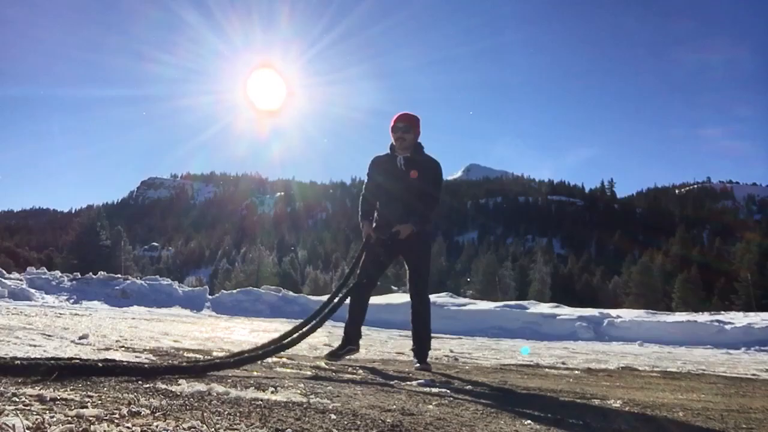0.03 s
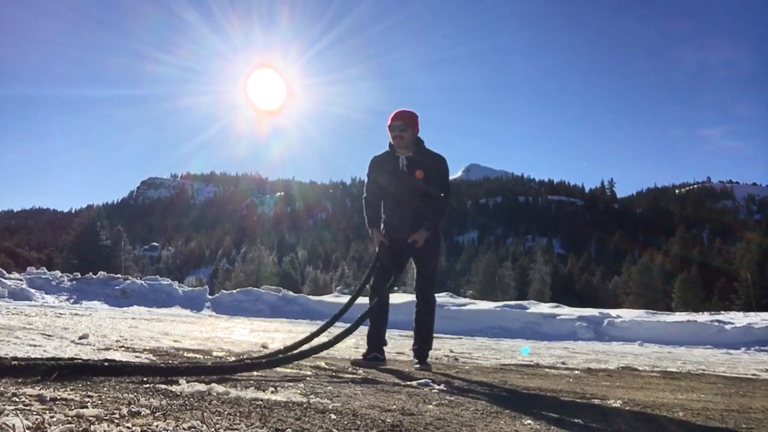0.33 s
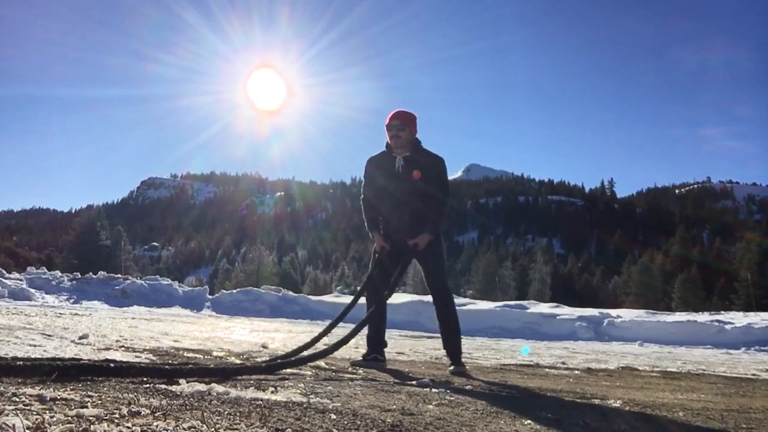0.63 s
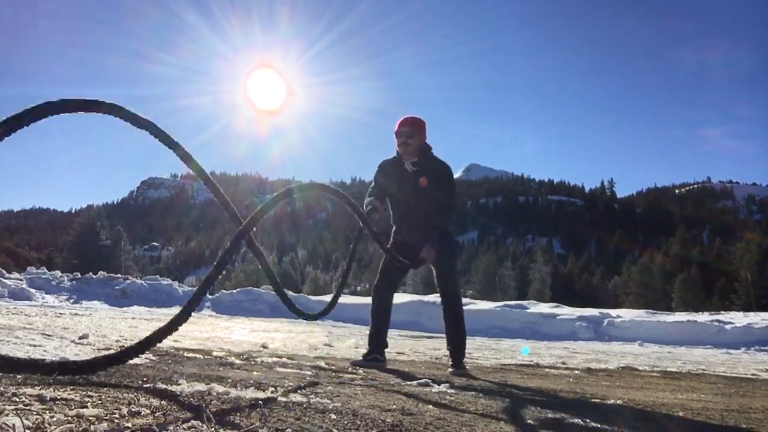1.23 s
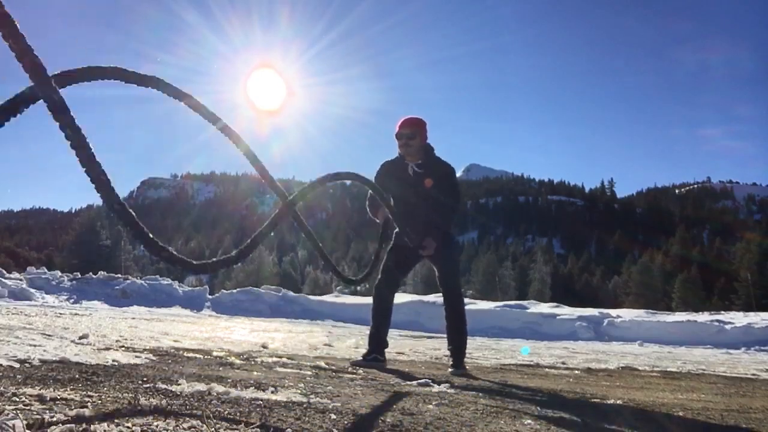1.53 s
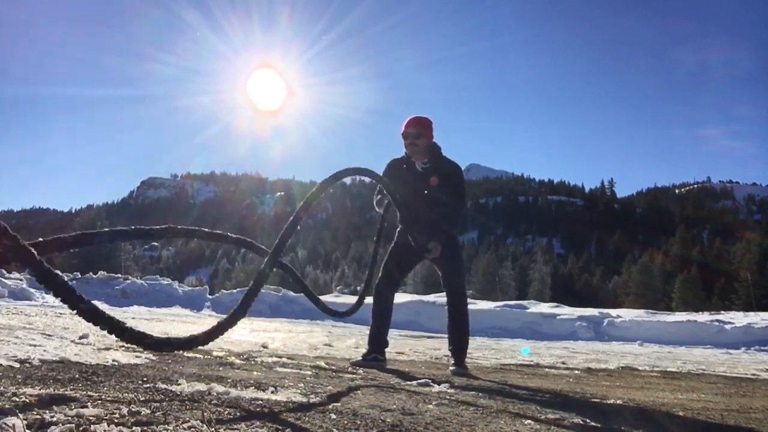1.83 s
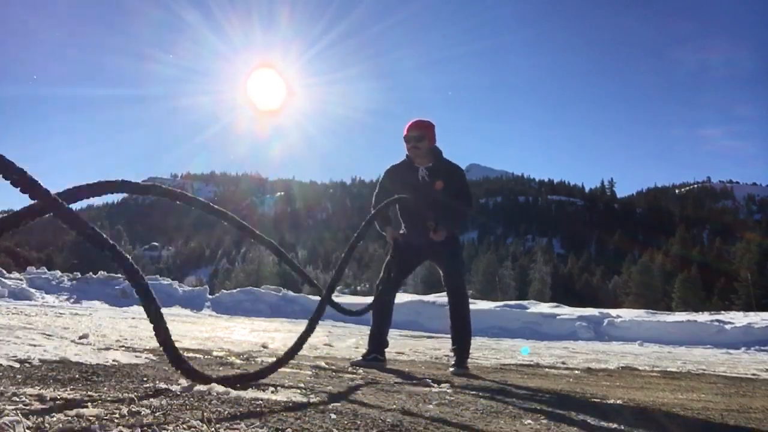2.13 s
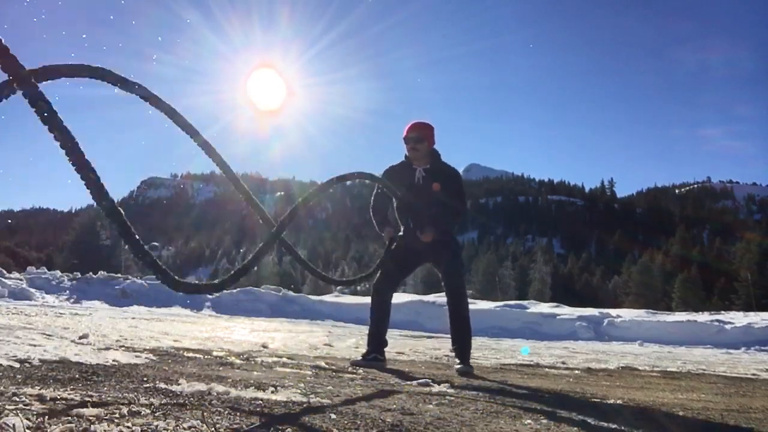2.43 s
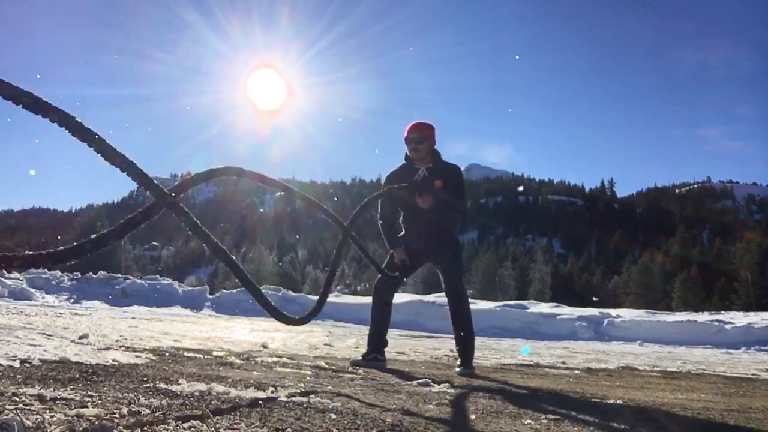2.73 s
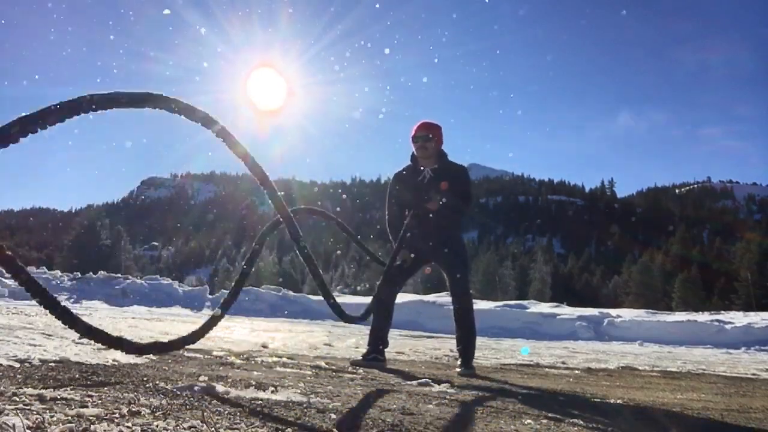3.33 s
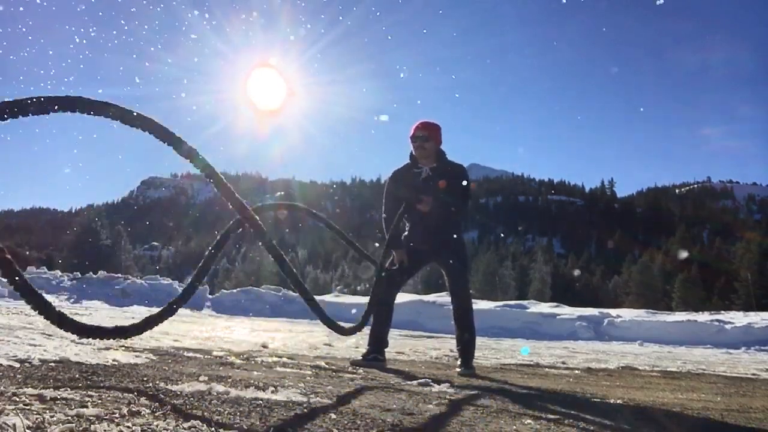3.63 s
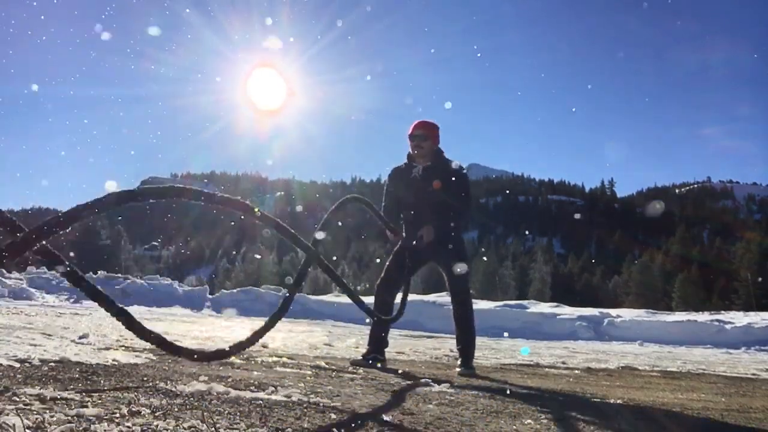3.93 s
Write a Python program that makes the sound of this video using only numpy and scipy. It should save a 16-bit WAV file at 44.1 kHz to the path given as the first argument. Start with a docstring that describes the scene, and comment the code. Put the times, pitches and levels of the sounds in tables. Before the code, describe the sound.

Two heavy ropes thump repeatedly on icy gravel, crunching and scattering grit outdoors.

```python
"""Outdoors on frozen, gritty ground: two heavy ropes are whipped down in turn.
Each landing loop gives a low thump that falls in pitch and a crunch of gravel and ice; thrown grit
patters down after it. Feet shuffle before the first blow. The ropes drag over the grit and their
twisted fibres rasp. Light wind and a faint far hum lie underneath."""
import sys
import numpy as np
from scipy import signal
from scipy.io import wavfile
from scipy.ndimage import map_coordinates

SR = 44100
rng = np.random.default_rng(int(sys.argv[2]) if len(sys.argv) > 2 else 0)


def file_out(sig):
    """Save sig as 16-bit WAV at sys.argv[1]."""
    # one column per channel
    cols = np.atleast_2d(sig).T
    # limit, then scale
    lim = np.clip(cols, -1, 1)
    pcm = np.round(lim * 32767).astype(np.int16)
    wavfile.write(sys.argv[1], SR, pcm)


N = 176400
TIME_S = np.arange(N) / SR

# Spectra. Each row: frequency in Hz, relative density in dB.
WIND_SPECTRUM = [(25, -23), (45, -1.5), (70, -4), (110, -1), (160, -3), (210, -5.5), (300, -1.5),
                 (400, -15.5), (750, -15.5), (1800, -31.5), (6000, -37), (15000, -49)]
GRIT_SPECTRUM = [(500, -4), (1200, -1), (2200, 3), (4000, -2), (5400, -1.5), (7500, -0.5), (11000, 1.5),
                 (15500, 1)]
SCUFF_SPECTRUM = [(300, 7), (1000, -2.5), (2500, -2.5), (5000, -14), (15000, -24)]
ICE_SPECTRUM = [(500, -21), (1200, -12.5), (2200, -1.5), (4000, -6.5), (5400, -1), (7500, -3.5), (11000, 0),
                (15500, -0.5)]
GRAVEL_SPECTRUM = [(200, 10), (400, 8), (650, -4), (1200, -8), (2000, -7), (4000, -12), (15000, -45)]
SWING_SPECTRUM = [(40, 7), (90, 8), (200, 6.5), (400, -1), (1000, -15.5), (3000, -94.5), (15000, -58)]
SPRAY_SPECTRUM = [(2000, -21), (6000, -7), (11000, -6.5), (15500, -3)]
# Ropes lifted off the grit. Each row: time in seconds, relative level in dB.
DRAG_CURVE = [(.04, -67.5), (.2, -71), (.5, -60.5), (.56, -79), (.7, -70), (.8, -70.5), (.9, -64),
              (.95, -70), (1.07, -70), (1.11, -57), (1.18, -61), (1.25, -73.5), (1.31, -54.5), (1.39, -53),
              (1.46, -57), (1.52, -58), (1.58, -55)]
# Loose grit while the ropes swing. Each row: time in seconds, relative level in dB.
PATTER_CURVE = [(1.58, -65), (1.66, -51.5), (1.86, -51.5), (2.05, -51), (2.25, -55), (2.42, -51),
                (2.55, -44), (2.62, -51.5), (2.76, -51.5), (2.94, -44.5), (3.07, -54.5), (3.15, -45),
                (3.23, -56), (3.38, -49), (3.6, -49), (3.74, -49.5), (3.86, -53), (4, -45.5)]
# Fibre resonances. Each row: frequency in Hz, width in Hz, relative level in dB.
FIBRE_MODES = [(1700, 34, -5.5), (1897, 40, -3), (1980, 186, 0), (2270, 120, -14.5), (3180, 140, -12)]
# Swells. Each row: centre in seconds, level in dB, half length in seconds.
FIBRE_RUBS = [(1.5, -59.5, 0.029), (1.655, -47, 0.02), (1.83, -50, 0.051), (2.37, -49.5, 0.014),
              (2.44, -48.5, 0.03), (2.575, -59.5, 0.11), (2.73, -53.5, 0.11), (2.87, -49, 0.044),
              (2.94, -56, 0.017), (3.035, -47.5, 0.011), (3.18, -52.5, 0.021), (3.255, -53, 0.028),
              (3.375, -57, 0.023), (3.565, -46.5, 0.016), (3.645, -50.5, 0.028), (3.85, -52, 0.027),
              (3.93, -57, .02)]
SCUFFS = [(0.114, -58, 0.037), (0.24, -52.5, 0.015), (.365, -53.5, 0.021), (.405, -50.5, 0.012),
          (.462, -53, .01), (.51, -54, 0.026), (1.051, -56.5, 0.022), (1.169, -49, 0.0087),
          (1.354, -74, .06)]
SLEEVE_BRUSHES = [(0.698, -58, 0.019)]
WIND_PUFFS = [(1.3, -62, 0.25), (1.8, -50, 0.044), (2.83, -51, 0.075)]
# Chips landing close by. Each row: start in seconds, peak in dB, band centre in Hz.
CHIP_LANDINGS = [(0.235, -50, 4500), (1.173, -40, 5000), (1.604, -26, 8600), (1.772, -27, 7900),
                 (1.9, -20, 6260), (1.9208, -22.5, 8800), (2.015, -25, 8040), (2.1441, -20.5, 3020),
                 (2.155, -15, 8000), (2.4654, -17, 7100), (2.528, -23.5, 9800), (2.6075, -24, 11300),
                 (2.7945, -16, 6000), (2.8014, -16.5, 8000), (2.821, -30, 10000), (2.846, -21.5, 6600),
                 (2.9809, -23.5, 2460), (3.103, -18.5, 6000), (3.364, -25.5, 9100), (3.396, -29, 10000),
                 (3.4368, -15.5, 8000), (3.711, -24.5, 10600), (3.7138, -14.5, 9000), (3.7599, -12, 12100),
                 (3.7605, -25.5, 1410), (3.7795, -17, 7000), (3.803, -27, 1620), (3.823, -28, 12000),
                 (3.844, -26, 12100), (3.887, -25, 10000), (3.929, -24.5, 2780), (3.957, -23.5, 5700)]
# Rope crushing grit. Each row: start in seconds, ice and gravel levels in dB,
# then attack, hold and release in seconds.
GRIT_CRUSHES = [(1.593, -34, -34, 0.02, 0.0048, 0.017), (1.689, -43.5, -34.5, 0.01, 0.0064, 0.024),
                (1.76, -34.5, -43, 0.0088, 0.0022, 0.016), (1.89, -38.5, -51, 0.0022, .003, 0.046),
                (1.941, -37.5, -34, 0.0044, 0.022, 0.0041), (2.007, -38, -47.5, 0.0044, 0.0035, 0.009),
                (2.0244, -34.5, -32, 0.0014, 0.0017, 0.0052), (2.094, -48.5, -37.5, 0.001, 0.017, 0.0096),
                (2.1506, -33, -53.5, 0.0025, .013, 0.032), (2.283, -39.5, -68, 0.0073, 0.0022, 0.016),
                (2.342, -43, -38, 0.0073, .004, .009), (2.462, -30, -45, 0.0017, 0.018, 0.012),
                (2.654, -36.5, -25.5, 0.0096, 0.003, 0.0027), (2.793, -25, -42.5, 0.0012, 0.0046, 0.011),
                (2.972, -44.5, -41.5, 0.0031, 0.037, 0.0057), (3.094, -29, -38, 0.0054, 0.0022, 0.011),
                (3.116, -33.5, -42, 0.0018, 0.0035, 0.0092), (3.303, -33.5, -35.5, 0.019, 0.007, 0.0056),
                (3.4342, -28.5, -45.5, 0.0011, 0.023, 0.0089), (3.551, -44, -65, 0.013, 0.0026, 0.0066),
                (3.652, -33, -40.5, 0.0056, 0.0012, 0.0036), (3.7786, -23.5, -38, 0.0011, .002, 0.004),
                (3.784, -32.5, -41, .003, 0.012, 0.032), (3.941, -38.5, -46, 0.012, 0.0017, 0.0045),
                (3.984, -38.5, -45, .005, 0.0075, .015)]
# Loops landing. Each row: start in seconds, envelope peak in dB, initial pitch in Hz, rise in seconds.
LOOP_LANDINGS = [(1.6153, -14.5, 179, 0.0028), (1.708, -26, 187, 0.0054), (1.773, -36, 198, 0.0023),
                 (1.904, -31, 222, 0.0028), (1.946, -30.5, 1410, 0.00094), (1.957, -30.5, 480, 0.0011),
                 (2.0278, -27.5, 770, 0.0012), (2.0337, -15, 200, 0.0042), (2.096, -28.5, 825, 0.00057),
                 (2.157, -30, 217, 0.0028), (2.3504, -19, 173, 0.0061), (2.467, -25, 200, 0.0038),
                 (2.6631, -13.5, 284, 0.0055), (2.665, -26.5, 420, 0.0022), (2.809, -29, 228, 0.0025),
                 (3.0013, -8.5, 193, 0.0039), (3.107, -29.5, 354, 0.0024), (3.1426, -20, 178, 0.0047),
                 (3.323, -23, 167, 0.0055), (3.3225, -31, 700, 0.0015), (3.4392, -17, 204, 0.0019),
                 (3.546, -28, 218, 0.0042), (3.657, -26.5, 790, 0.00072), (3.6583, -19, 368, 0.003),
                 (3.6601, -9.5, 195, 0.0049), (3.781, -29.5, 216, 0.0042), (3.847, -23, 190, 0.006)]


def from_db(db):
    return 10 ** (np.asarray(db) / 20)


def unit_rms(x):
    return x / np.sqrt(np.mean(x ** 2) + 1e-20)


def white():
    return rng.standard_normal(N)


def band(x, low_hz, high_hz):
    sos = signal.butter(2, [low_hz, min(high_hz, .47 * SR)], "band", fs=SR, output="sos")
    return signal.sosfilt(sos, x + 1e-18)


def resonate(x, hz, width_hz):
    """One resonance, rms 1."""
    r = np.exp(-np.pi * width_hz / SR)
    return unit_rms(signal.lfilter([1, 0, -1], [1, -2 * r * np.cos(2 * np.pi * hz / SR), r * r], x))


def curve_gain(rows, fade_s=0.0067):
    """Gain along a level curve, fading beyond its ends."""
    times_s, db = np.transpose(rows)
    outside_s = np.abs(TIME_S - np.clip(TIME_S, times_s[0], times_s[-1]))
    return from_db(np.interp(TIME_S, times_s, db)) * np.exp(-outside_s / fade_s)


def swells(rows):
    """Sum of bell-shaped gains."""
    return sum(from_db(db) * np.exp(-np.minimum(((TIME_S - centre_s) / half_s) ** 2, 20))
               for centre_s, db, half_s in rows)


def flutter(rate_hz, depth_db):
    """Randomly wandering gain."""
    knots = rng.standard_normal(2000)
    return from_db(depth_db * np.interp(TIME_S * rate_hz, np.arange(len(knots)), knots))


def coloured(spectrum, source):
    """Weighted half-octave bands, fed in rotation by three draws of the source; rms 1."""
    hz, db = np.transpose(spectrum)
    edges_hz = 24 * 2 ** np.arange(0, 10, .5)
    out, feeds = 0, [source(), source(), source()]
    for k, (low, high) in enumerate(zip(edges_hz, edges_hz[1:])):
        if high > hz[0]:
            band_db = np.interp(np.log(low * high) / 2, np.log(hz), db)
            out = out + from_db(band_db) * band(feeds[k % len(feeds)], low, high)
    return unit_rms(out)


def wind(steady_db=-52.5, swing_db=-52.5):
    """Low wind, more once the ropes swing."""
    swinging = np.interp(TIME_S, [1.25, 1.7], [0, 1])
    stirred = swinging * from_db(swing_db) * coloured(SWING_SPECTRUM, white)
    return from_db(steady_db) * coloured(WIND_SPECTRUM, white) + stirred


def hum(base_hz=157.6, waver_hz=2.5, level_db=-52.5):
    """Far tone, wavering in pitch and level."""
    hz = base_hz + waver_hz * (flutter(8.3, depth_db=4) - 0.5)
    tone = np.sin(2 * np.pi * np.cumsum(hz) / SR)
    return from_db(level_db) * unit_rms(tone * flutter(21, depth_db=4))


def grains(spectrum, per_s, spread_db):
    """Tiny random fractures of uneven size."""
    hits = rng.random(N) < per_s / SR
    sizes = hits * from_db(spread_db * np.minimum(rng.exponential(1, N), 4))
    return ground_bounce(coloured(spectrum, lambda: sizes * white() * flutter(40, depth_db=2.25)))


def ground_bounce(x, gain=0.31, typical_lag_s=0.001107):
    """Add the reflection off hard ground; the lag wanders as contact moves along the rope."""
    lag_s = typical_lag_s * flutter(7, depth_db=2.5)
    reflected = map_coordinates(x, [(TIME_S - lag_s) * SR], order=3)
    return (x + gain * reflected) / np.hypot(1, gain)


def dragging(grit_trim_db=1):
    """Loose grit shifts under the ropes; twisted fibres rub as they flex."""
    grit = grains(GRIT_SPECTRUM, per_s=3500, spread_db=1) * flutter(70, depth_db=5)
    grit_gain = from_db(grit_trim_db) * (curve_gain(DRAG_CURVE) + curve_gain(PATTER_CURVE))
    modes = sum(from_db(db) * resonate(white(), hz, width_hz) for hz, width_hz, db in FIBRE_MODES)
    rasp = unit_rms(modes) * flutter(160, depth_db=4)
    return grit_gain * grit + swells(FIBRE_RUBS) * rasp


def shuffles():
    """Feet and rope scuff; a sleeve brushes the jacket."""
    cloth = swells(SLEEVE_BRUSHES) * unit_rms(band(white(), 5000, 11500))
    return swells(SCUFFS) * grains(SCUFF_SPECTRUM, per_s=1400, spread_db=5.5) + cloth


def chips(decay_s=.0007, edge_ratio=1.7):
    """Each chip of ice or stone lands with one short tick."""
    out, t = np.zeros(N), np.arange(SR // 50) / SR
    for start_s, db, hz in CHIP_LANDINGS:
        burst = rng.standard_normal(len(t)) * np.exp(-t / decay_s)
        tick = band(burst, hz / edge_ratio, hz * edge_ratio)
        i = int(start_s * SR)
        out[i:i + len(t)] += (from_db(db) * tick / np.abs(tick).max())[:N - i]
    return out


def gusts():
    """Soft, deep puffs of wind."""
    return swells(WIND_PUFFS) * unit_rms(band(white(), 45, 120))


def crunches(spray_re_ice_db=-29.5, spray_rise_s=0.032):
    """Ice and gravel break under the rolling rope; a thin spray of grit follows."""
    ice_power, gravel_power, spray_power = np.zeros((3, N))
    for start_s, ice_db, gravel_db, attack_s, hold_s, release_s in GRIT_CRUSHES:
        t = np.maximum(TIME_S - start_s, 0)
        release = np.exp(-np.clip((t - attack_s - hold_s) / release_s, 0, 20))
        press = np.minimum(t / attack_s, 1) ** 2 * release
        ice_power += (from_db(ice_db) * press) ** 2
        gravel_power += (from_db(gravel_db) * press) ** 2
        flight = np.minimum(t / spray_rise_s, 20)
        spray_power += (from_db(ice_db + spray_re_ice_db) * flight ** 2 * np.exp(2 - 2 * flight)) ** 2
    ice = np.sqrt(ice_power) * grains(ICE_SPECTRUM, per_s=9000, spread_db=3)
    gravel = np.sqrt(gravel_power) * grains(GRAVEL_SPECTRUM, per_s=2500, spread_db=4)
    crush = (ice + gravel) * flutter(300, depth_db=3)
    spray = np.sqrt(spray_power) * grains(SPRAY_SPECTRUM, per_s=3000, spread_db=2.5)
    return crush + spray


def thumps(fall_s=.017, sharpness=1.33):
    """Each landing is a pulse of a few cycles; pitch drops as the loop flattens."""
    out, t = np.zeros(N), np.arange(SR // 10) / SR
    for start_s, db, hz, rise_s in LOOP_LANDINGS:
        cycles = hz * fall_s * (1 - np.exp(-t / fall_s))
        envelope = (t / rise_s * np.exp(1 - t / rise_s)) ** sharpness
        pulse = -from_db(db) * envelope * np.sin(2 * np.pi * cycles)
        i = int(start_s * SR)
        out[i:i + len(t)] += pulse[:N - i]
    return out


def snowbank_echo(x, level_db=-36.5, t60_s=0.087, delay_s=.012, top_hz=2540):
    """Weak, dull scatter from the snowbanks."""
    t = np.arange(SR // 2) / SR
    tail = band(rng.standard_normal(len(t)), 90, top_hz) * from_db(-60 * t / t60_s) * (t > delay_s)
    passband_norm = np.sqrt(SR / 2 / top_hz / np.sum(tail ** 2))
    return from_db(level_db) * passband_norm * signal.fftconvolve(x, tail)[:N]


def scene():
    """Ropes, ground and open air; mono."""
    blows = thumps() + crunches() + chips()
    return (blows + snowbank_echo(blows) + dragging() + shuffles() + wind() + hum() + gusts())[None]


def record(dry):
    """Quick fade-in, low cut, high cut."""
    low_cut_hz, high_cut_hz = 40, 16000
    fade_in = np.interp(TIME_S, [.03, .038], [.02, 1])
    highpass = signal.butter(2, low_cut_hz, "high", fs=SR, output="sos")
    lowpass = signal.ellip(10, .2, 80, high_cut_hz, fs=SR, output="sos")
    return signal.sosfilt(lowpass, signal.sosfilt(highpass, dry * fade_in))


dry = scene()
out = record(dry)
file_out(out)
```